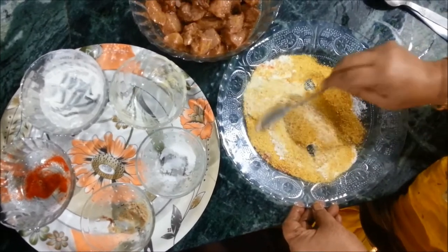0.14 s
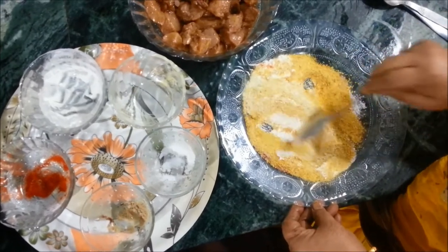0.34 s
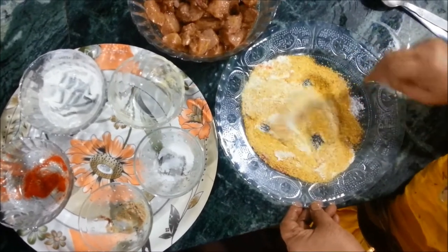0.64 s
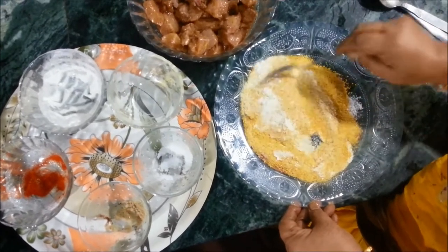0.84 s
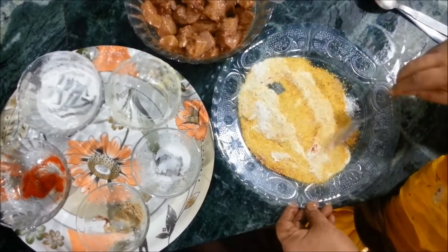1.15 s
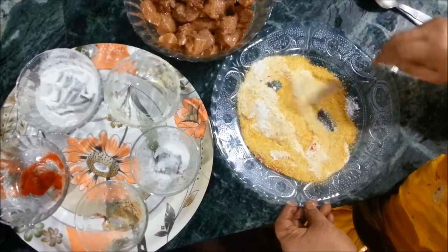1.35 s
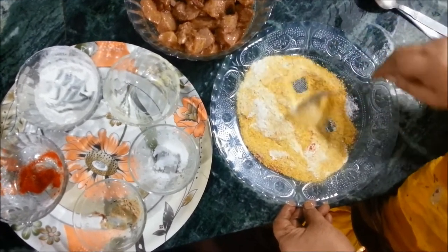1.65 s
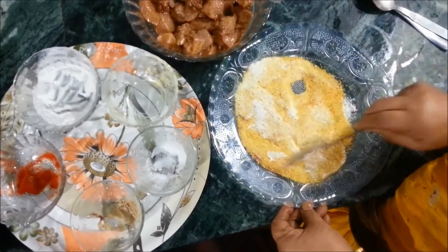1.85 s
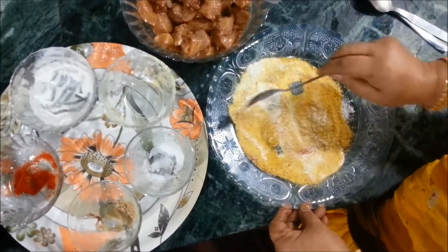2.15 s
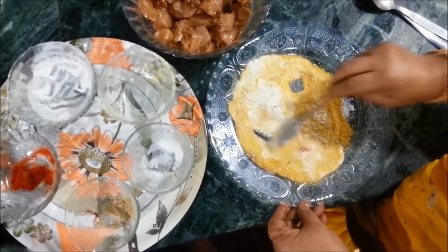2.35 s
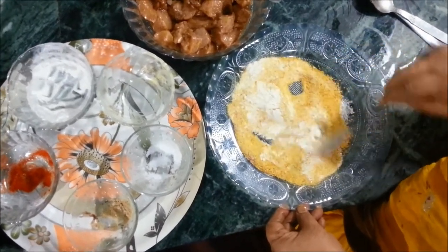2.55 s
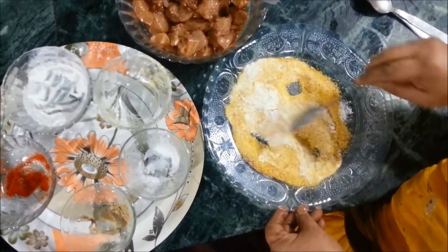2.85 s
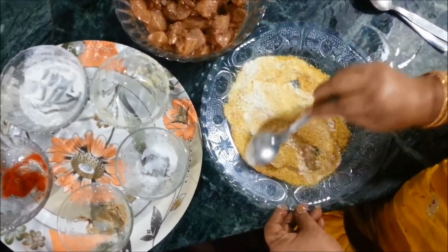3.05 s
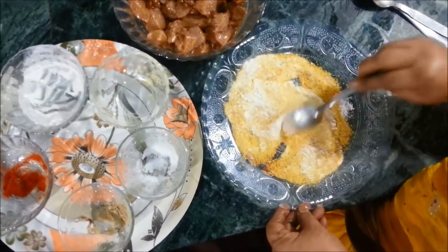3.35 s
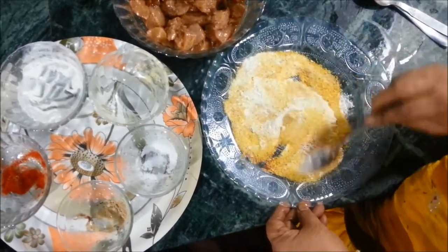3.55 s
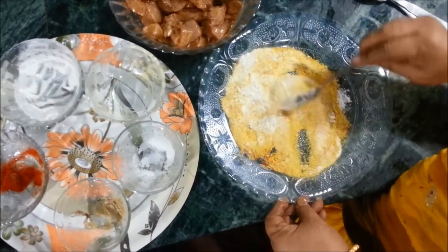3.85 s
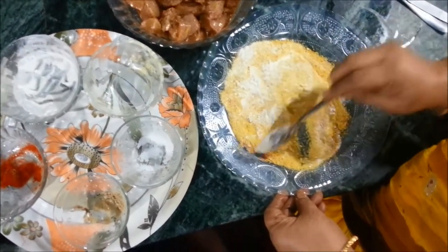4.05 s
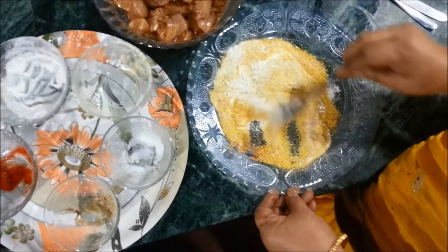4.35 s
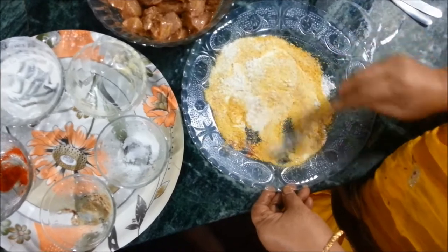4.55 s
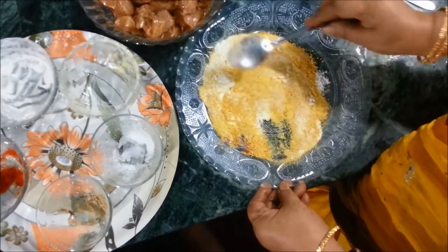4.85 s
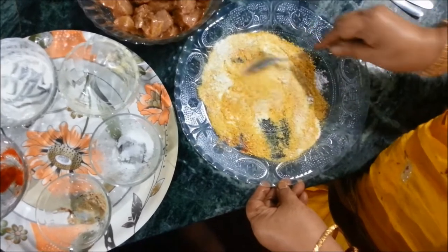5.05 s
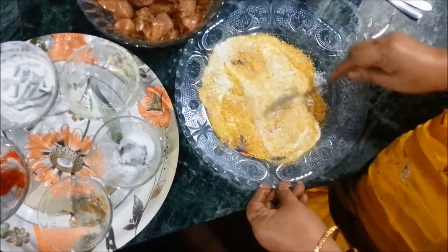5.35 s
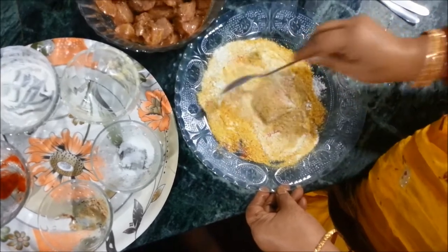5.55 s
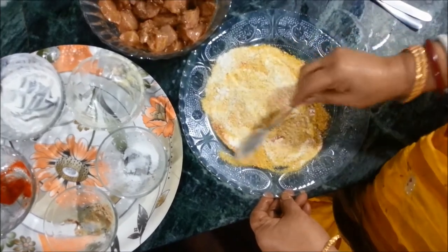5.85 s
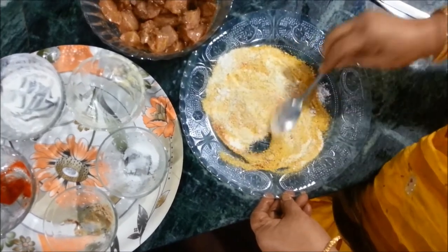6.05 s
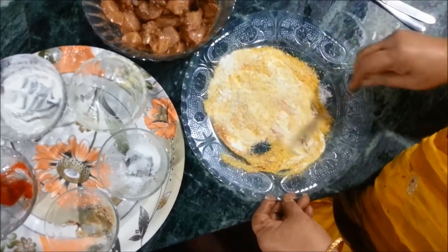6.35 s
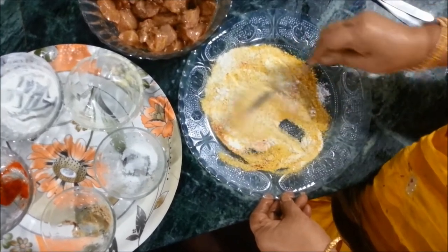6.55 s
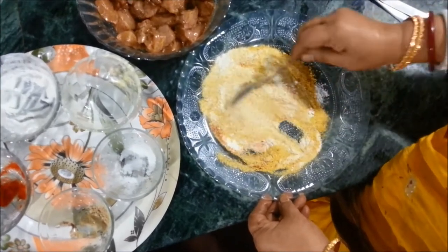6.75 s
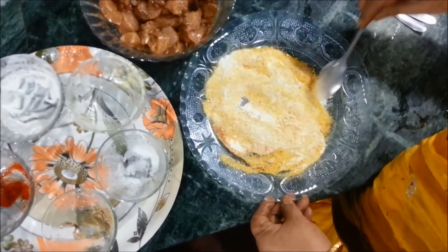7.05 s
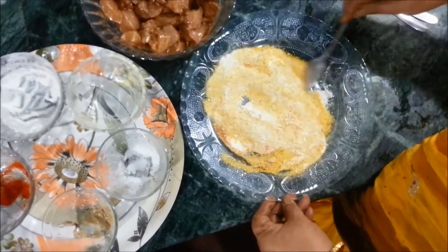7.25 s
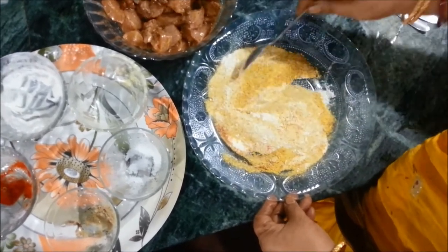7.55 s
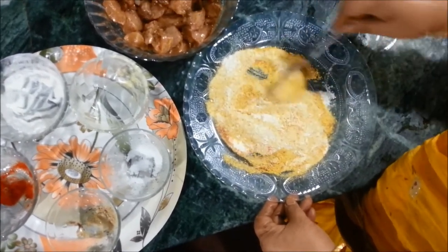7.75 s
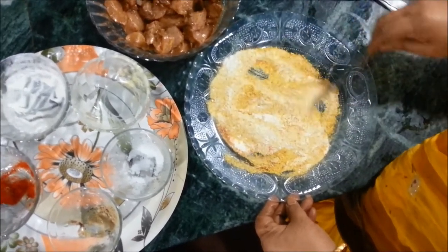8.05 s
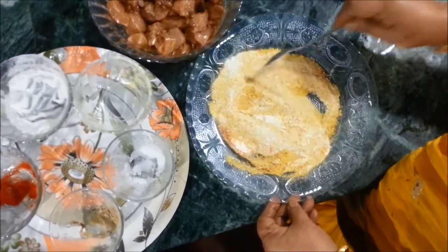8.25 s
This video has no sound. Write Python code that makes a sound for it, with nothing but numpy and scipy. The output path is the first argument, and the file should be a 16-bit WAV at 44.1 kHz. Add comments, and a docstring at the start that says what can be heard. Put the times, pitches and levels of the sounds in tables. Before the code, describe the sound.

A close stereo view of a steel spoon stirring dry flour in a glass plate on a stone counter, in a small kitchen with short reverberation. From 0 to 3 seconds the strokes are short, light and gritty, two or three a second, with powdery hiss, a crisp tick at 0.5 and small bangle clinks at 0.6 and 1.9. At 3.1 a bright, hard glass clack with a scratchy rasp is the loudest event. Fuller, duller drags follow, with a solid knock at 4.2. Bangles tinkle around 5.7 to 5.8 as longer soft drags and a faint plate judder run to 6.5. Dry taps on the right come at 6.1 to 6.2, a firm low-mid knock at 7.15, bangles at 7.7, and a last scrape and knock at 8.3. Soft hiss persists; low hum swells, strongest near 6, with barely audible far tones.

```python
"""A steel spoon stirs a dry flour mixture in a glass plate on a stone counter, in a small kitchen.
Its drag, scrape and powder hiss are gritty noise, roughened by stick and slip and coloured by the plate.
Knocks are short grit bursts through the same resonances; the stirrer's bangles clink as decaying sines.
Small dry taps sound to the side, and the held plate shifts once as a juddering band of noise.
Behind lie a soft hiss, a swelling low hum with its rumble, and a few faint far tones of narrow noise."""
import sys
import numpy as np
from scipy import signal
from scipy.fft import rfft, irfft, next_fast_len
from scipy.io import wavfile

SR = 44100
rng = np.random.default_rng(int(sys.argv[2]) if len(sys.argv) > 2 else 0)


def persist_wave(psi):
    """Save psi, clipped to +-1, as 16-bit WAV."""
    counts = np.round(np.clip(psi, -1, 1) * 32767).astype(np.int16)
    wavfile.write(sys.argv[1], SR, np.atleast_2d(counts).T)


N = 369999
TIME = np.arange(N) / SR   # seconds

# colour of the gritty contact, shared by strokes and knocks: (frequency [Hz], relative density [dB per Hz])
CONTACT_COLOUR = [(120, 11.5), (300, 2.5), (800, 1), (1400, -1.5), (2100, -0.5), (2550, -3.5), (3100, -6),
                  (5000, 0.5), (7600, -2), (8800, -2.5), (12000, -4), (15000, -15)]


def stirring(drag_trim_db=-4.5, scrape_trim_db=-5.5, hiss_trim_db=-7.0, alike=0.15):
    """The spoon pushes the heap, scrapes the glass under it, and the powder hisses round its edge."""
    drag_db, scrape_db, hiss_db = stroke_levels()
    grit = coloured(stereo_noise(alike) + lumps(), CONTACT_COLOUR)
    drag = rub(grit, drag_db + drag_trim_db, 137, 1010, slips_per_s=90, slip_db=3.5, grain_db=2.0)
    scrape = rub(grit, scrape_db + scrape_trim_db, 964, 4250, slips_per_s=86, slip_db=2.5, grain_db=1.0)
    hiss = rub(grit, hiss_db + hiss_trim_db, 5520, 16000, slips_per_s=68, slip_db=2.0, grain_db=0.5)
    return drag + scrape + hiss


# the spoon's strokes, levels before the layer trims:
# (start [s], length [s], dull drag [dB], scrape on glass [dB], powder hiss [dB])
STROKES = [(0.0, 0.015, -55.5, -58, -47), (0.207, 0.06, -58.5, -56.5, -50.5),
           (0.345, 0.045, -78, -63.5, -50.5), (0.532, 0.09, -56, -49, -43),
           (0.886, 0.072, -57.5, -51.0, -50.5), (1.215, 0.13, -57.5, -49, -45.5),
           (1.565, 0.06, -58.5, -46.5, -44.0), (1.928, 0.062, -55.5, -49, -45.5),
           (2.085, 0.028, -56, -53, -62), (2.272, 0.15, -59.5, -56, -54), (2.692, 0.095, -53.5, -46, -46.5),
           (3.136, 0.13, -44, -32.5, -41), (3.284, 0.098, -57.5, -58, -45), (3.545, 0.15, -68, -61.5, -53),
           (3.65, 0.12, -49, -45, -43.5), (3.814, 0.19, -64, -60.5, -52.5), (4.159, 0.11, -43.5, -44, -44),
           (4.559, 0.093, -39.5, -43.5, -43), (4.945, 0.074, -75, -59, -49.5),
           (5.3, 0.042, -63, -49.5, -47.5), (5.366, 0.21, -56.0, -72, -80),
           (5.695, 0.047, -53.5, -52.5, -48), (5.771, 0.21, -48, -47, -45),
           (5.93, 0.29, -50.5, -51.5, -50.5), (6.324, 0.16, -50.5, -47, -45),
           (6.617, 0.26, -63, -60.5, -52), (7.143, 0.12, -44, -42, -48), (7.279, 0.031, -55, -40, -42.5),
           (7.625, 0.015, -57, -53, -46.5), (7.708, 0.057, -63, -53, -47.5), (8.017, 0.13, -55, -49, -43.5),
           (8.328, 0.06, -43.5, -43.0, -42)]
# between strokes the spoon only shifts loose powder: (drag [dB], scrape [dB], hiss [dB]), before the trims
IDLE_LEVELS = (-71, -69.5, -62)
IDLE_TURNS_PER_S, IDLE_SWING_DB = 12, 7.5
# every stroke bites, eases a little as the heap gives way, and lets go
BITE_S, EASE_DB = 0.024, 2
RELEASE_DB_PER_S, SETTLE_DB_PER_S = 218.5, 127.5   # the powder settles more slowly


def stroke_levels():
    """Drag, scrape and hiss in dB: all three follow the bite, hold and release of each stroke."""
    idle_db = np.array(IDLE_LEVELS)[:, None] + IDLE_SWING_DB * drift(IDLE_TURNS_PER_S)
    power = from_db(idle_db) ** 2
    fall = np.array([[RELEASE_DB_PER_S], [RELEASE_DB_PER_S], [SETTLE_DB_PER_S]])
    for start, length, *levels_db in STROKES:
        near = slice(*np.searchsorted(TIME, [start - BITE_S, start + length + .5]))
        t = TIME[near] - start
        bite = np.clip(t / BITE_S + .5, 0, 1)   # half way in at the start time
        ease_db = EASE_DB * (.5 - np.clip(t / length, 0, 1))
        release_db = fall * np.maximum(t - length, 0)
        stroke_db = np.array(levels_db)[:, None] + ease_db - release_db
        power[:, near] += (bite * from_db(stroke_db)) ** 2
    return 10 * np.log10(power)


def lumps(lumps_per_s=40, lump_db=22):
    """Small lumps crack under the spoon at random moments, uneven in size, well above the fine grit."""
    cracks = rng.random(N) < lumps_per_s / SR
    return from_db(lump_db) * cracks * rng.standard_normal(N)


def rub(grit, level_db, low_hz, high_hz, slips_per_s, slip_db, grain_db):
    """Friction: the spoon sticks and slips, and crushes grains of uneven size against the glass."""
    force = from_db(slip_db * drift(slips_per_s) + grain_db * drift(1400))
    return from_db(level_db) * rms_one(plate(grit * force, low_hz, high_hz))


# chatter of the spoon's edge: (start [s], end [s], pitch [Hz], width [Hz], level [dB])
RASPS = [(3.12, 3.165, 1656, 356, -30.5), (3.141, 3.19, 5920, 298, -31.5), (3.215, 3.26, 1535, 400, -31.5),
         (4.168, 4.26, 894, 690, -37.5), (4.19, 4.36, 474, 89, -49.5), (5.75, 5.97, 1314, 850, -50)]


def rasps():
    """The spoon's edge chatters during a stroke and takes on a pitch."""
    return narrow_sounds(RASPS, fade_s=0.0037)


# spoon meets plate: (time [s], level before trims [dB], strongest pitch [Hz], fall away from it [dB per octave])
KNOCKS = [(0.525, -23, 6950, 19), (0.548, -43.5, 450, 4.5), (0.9508, -45.5, 520, 7),
          (1.2521, -43, 420, 5.5), (1.317, -38.5, 5000, 3.5), (1.617, -50.5, 1500, 5.5),
          (2.0976, -48, 1180, 5.5), (2.7206, -46, 850, 5), (2.8093, -41.5, 600, 8.5),
          (2.9209, -45, 1390, 1.5), (2.9287, -43.5, 540, 6.5), (3.124, -33.5, 7000, 1),
          (3.14, -13.5, 4600, 6), (3.2393, -36.5, 1520, 1.2), (3.6697, -36.5, 920, 4.5),
          (4.1662, -20.5, 990, 12.5), (4.202, -30.5, 1100, 6), (4.5598, -38, 7040, 1.1),
          (4.6267, -45, 600, 2), (6.338, -44, 480, 4), (7.155, -19, 1970, 14), (7.634, -49, 2100, 9),
          (8.02, -35.5, 3580, 4.5), (8.138, -49, 2000, 6), (8.3336, -27.5, 2640, 6.5)]


def knocks(thud_decay_s=0.0087, contact_decay_s=0.0015, thud_db=1.0, body_db=-1.0, ring_db=-4.0,
           tick_db=-2.0, top_db=-17.0, hardness=0.57, alike=0.39):
    """A brief gritty contact sets the plate ringing, most strongly round one pitch; the thud lasts longest."""
    size = SR // 20
    t, out = np.arange(size) / SR, np.zeros((2, N + size))
    ranges_hz = [(220, 1030), (1150, 2190), (2800, 5000), (5600, 9200), (8600, 15600)]   # thud up to top
    trims_db = [thud_db, body_db, ring_db, tick_db, top_db]
    middles_hz = np.sqrt(np.prod(ranges_hz[:-1], axis=1))
    for s, level_db, hz, fall_db in KNOCKS:
        octaves_away = np.abs(np.log2(middles_hz / hz))
        thud, body, ring, tick = level_db - fall_db * octaves_away
        top = tick + hardness * (tick - ring)   # a hard, light contact reaches highest
        levels_db = np.add([thud, body, ring, tick, top], trims_db)
        grit = coloured(stereo_noise(alike, size=size), CONTACT_COLOUR)
        at = round(s * SR)
        for k, (low_hz, high_hz) in enumerate(ranges_hz):
            decay_s = contact_decay_s if k else thud_decay_s
            part = plate(grit * np.exp(-t / decay_s), low_hz, high_hz)
            out[:, at:at + size] += burst(part, levels_db[k], 0)
    return out[:, :N]


# resonances of the plate with the spoon on it: (pitch [Hz], width [Hz], lift [dB])
PLATE_RESONANCES = [(316.7, 22, 8.5), (461, 41, 7.5), (605, 95, 4), (903, 18, 3), (1065, 200, -0.5),
                    (1490, 29, 1), (1682, 15, 4.5), (1900, 34, 1.5), (2067, 120, 2), (2890, 35, 6.5),
                    (3550, 390, 3.5), (4610, 130, 2), (4970, 75, 6.5), (5890, 43, 7), (6100, 55, 7),
                    (6390, 76, 10), (6985, 410, 9.5), (7700, 130, 8.5), (9300, 91, -2.5)]


def plate(x, low_hz, high_hz):
    """One range of the plate's sound: each resonance in it weights its own pitch and rings on."""
    for hz, width_hz, lift_db in PLATE_RESONANCES:
        if low_hz < hz < high_hz:
            r = np.exp(-np.pi * width_hz / SR)   # pole radius: a narrow resonance rings longer
            feed = np.array([1, 0, -1]) * (1 - r * r) / 2
            feedback = [1, -2 * r * np.cos(2 * np.pi * hz / SR), r * r]
            x = x + (from_db(lift_db) - 1) * signal.lfilter(feed, feedback, x)
    return band(x, low_hz, high_hz)


# bangles touch: (time [s], level before trim [dB], top partials relative [dB])
CLINKS = [(0.2554, -43.5, -14), (0.558, -35.5, -10), (1.2027, -41, -14), (1.948, -31.5, -17),
          (2.836, -42.5, -7), (3.249, -36, -22), (4.7487, -42, -33), (4.955, -45, -26), (5.0902, -49, -16),
          (5.693, -40.5, -23), (5.7794, -33, -9), (5.825, -34.5, 0), (6.6221, -36.5, -4), (6.824, -51, -14),
          (7.4158, -50.5, -13), (7.7349, -38, -8), (7.75, -40.5, 1), (8.1888, -51, -8)]
# modes of the bangles: (pitch [Hz], relative level [dB], t60 [s])
BANGLE_MODES = [(3964, -15.5, 0.083), (5860, -13.5, 0.16), (7990, -0.5, 0.08), (8120, -1, 0.12),
                (8310, -5, 0.17), (11440, -15.5, 0.15), (13600, -2, 0.17), (13560, -14, 0.13)]
REBOUND_S, REBOUND_DB = .007, -4.5   # typical gap to the bounce, and its level below the touch


def bangles(level_db=-3.5, pan_db=3.5, spread_db=1.0, follow=0.47, usual_top_db=-6.0, tick_db=-4.0,
            detune=0.0022):
    """Metal rings touch and bounce once; each contact ticks and rings every mode with its own strength."""
    rebounds = [(s + REBOUND_S * 2 ** rng.uniform(-1, 1), peak + REBOUND_DB, top) for s, peak, top in CLINKS]
    s, peak_db, top_db = np.transpose(CLINKS + rebounds)
    at, t = np.round(s * SR).astype(int), np.arange(SR // 8) / SR
    hz, mode_db, t60 = np.transpose(BANGLE_MODES)[:, :, None]
    out, fade = np.zeros((2, N + len(t))), from_db(-60 * t / t60)
    for i, peak, top in zip(at, peak_db, top_db):
        brightness_db = follow * (top - usual_top_db) * (hz > 10000)   # moves the top partials only
        strength_db = mode_db + spread_db * rng.standard_normal(hz.shape) + brightness_db
        pitch = hz * (1 + detune * rng.standard_normal(hz.shape))   # no two bangles are quite alike
        phase = 2 * np.pi * rng.random((2, len(hz), 1))
        partials = from_db(strength_db) * fade * np.sin(2 * np.pi * pitch * t + phase)
        ring = np.sum(partials, axis=1)
        contact = rng.standard_normal((2, len(t))) * np.exp(-t / 0.0042)
        tick = from_db(tick_db) * band(contact, 4500, 14000)
        out[:, i:i + len(t)] += from_db(peak + level_db) * (ring + tick)
    return out[:, :N] * from_db([[pan_db / 2], [-pan_db / 2]])


# small close taps, levels before trims: (time [s], thud [dB], click [dB], left over right [dB])
TAPS = [(0.222, -55.5, -52, -23), (0.9056, -61, -54.5, -18), (1.4271, -59.5, -57, -18),
        (2.272, -53, -50.5, -26), (2.3622, -58, -54, -18), (4.114, -61, -49.5, -18),
        (6.1143, -53, -38.5, -32), (6.1827, -40, -41, -35), (7.1546, -62, -27, -4)]


def taps(decay_s=0.0022, thud_db=4.0, click_db=-1.0, split_hz=1080, top_hz=2600):
    """Soft, dead taps: a fast-fading push of noise split into thud and click, with no ring and no room."""
    size = SR // 20
    fade, out = np.exp(-np.arange(size) / SR / decay_s), np.zeros((2, N + size))
    for s, thud, click, pan_db in TAPS:
        at, push = round(s * SR), rng.standard_normal(size) * fade
        out[:, at:at + size] += burst(band(push, 60, split_hz), thud + thud_db, pan_db)
        out[:, at:at + size] += burst(band(push, split_hz, top_hz), click + click_db, pan_db)
    return out[:, :N]


# the held plate shifts on the counter: (start [s], end [s], pitch [Hz], width [Hz], level before judder [dB])
SHIFTS = [(5.85, 6.55, 245, 222, -55.5)]


def shifting(judder_db=4.5):
    """The plate judders as it slides on the stone: a low noise band with a fast, uneven level."""
    return narrow_sounds(SHIFTS, fade_s=0.071) * from_db(judder_db * drift(55))


# the kitchen's reverberation: (frequency [Hz], t60 [s])
KITCHEN_T60 = [(150, 0.25), (500, 0.39), (1500, 0.41), (4000, 0.46), (8000, 0.31), (15000, 0.39)]


def kitchen(x, wet_db=-8.0, early_db=-6.0, early_s=0.016, gap_s=0.0014, cross=0.17):
    """A quick burst of reflections off counter and dishes, and a diffuse tail with its own decay per band."""
    size = SR * 3 // 4
    t, tail = np.arange(size) / SR, 0
    edges_hz = np.geomspace(100, 16000, 9)
    for low_hz, high_hz in zip(edges_hz, edges_hz[1:]):
        t60 = at_hz(KITCHEN_T60, np.sqrt(low_hz * high_hz))
        tail = tail + band(rng.standard_normal((2, size)), low_hz, high_hz) * from_db(-60 * t / t60)
    early = stereo_noise(0.78, size=size) * np.exp(-t / early_s)
    arrived = np.clip(t / gap_s - 1, 0, 1)   # silent for one gap, fully in after two
    response = from_db(wet_db) * rms_one(tail * arrived) + from_db(early_db) * rms_one(early * arrived)
    spilled = x + cross * x[::-1]   # each side also feeds the other
    return signal.fftconvolve(spilled, response / np.sqrt(size), axes=1)[:, :N]


# faint tones come and go: (start [s], end [s], pitch [Hz], width [Hz], level before flutter [dB])
WHINES = [(.42, 0.89, 2850, 139, -72), (1.693, 1.936, 1840, 650, -65.5), (2.302, 2.7, 2820, 110, -75),
          (6.015, 6.526, 3274, 110, -59.5), (6.199, 6.506, 3630, 110, -58.5), (6.4, 6.95, 350, 98, -62),
          (6.505, 7.16, 3266, 80, -69), (6.499, 7.16, 3610, 110, -70)]


def whine(flutter_db=1.9):
    """Thin, unsteady tones from far away: narrow noise with a fluttering level."""
    return narrow_sounds(WHINES, fade_s=0.024) * from_db(flutter_db * drift(14))


# the hum swells and dips: (start [s], end [s], top of the arch above the resting hum's gain [dB])
HUM_SWELLS = [(2.2, 3.03, -67), (3.0, 3.56, -59.5), (3.524, 3.878, -54.5), (3.913, 4.465, -54.5),
              (4.496, 4.724, -58), (4.79, 5.334, -63), (5.243, 5.74, -55.5), (5.69, 6.243, -47),
              (6.18, 6.693, -46.5), (6.618, 7.282, -51.5), (7.27, 7.71, -55), (7.69, 7.95, -64.5),
              (7.95, 8.597, -54.5)]


def hum_level(rest_db=-73.5):
    """Each swell adds one smooth arch to the resting level; the result is in dB."""
    gain = from_db(rest_db)
    for start, end, top_db in HUM_SWELLS:
        gain = gain + from_db(top_db) * np.sin(np.pi * np.clip((TIME - start) / (end - start), 0, 1))
    return 20 * np.log10(gain)


# colour of the rumble: (frequency [Hz], relative density [dB per Hz])
RUMBLE_COLOUR = [(25, -4.5), (50, -0.5), (75, -22.5), (93, 14.5), (115, 1), (150, -5.5), (220, -1),
                 (400, -9.5), (800, -25.5)]
# colour of the hiss before the stereo balance: (frequency [Hz], relative density [dB per Hz])
HISS_COLOUR = [(59, -66), (100, 5.5), (152, -6), (330, -12), (962, -15), (1530, -16), (1920, -14),
               (3110, -16), (5150, -18.5), (6220, -6.5), (7050, -8), (8700, -19), (10700, -14.5),
               (13800, -15), (15000, -45)]


def background(hum_hz=59.2, waver=0.55, rumble_db=-58.5, usual_hum_db=-53.5, follow=0.61, hiss_db=-60.5):
    """A low sine hum wavering in phase, a lumpy noise rumble that swells with it, and steady hiss."""
    hum_db = hum_level()
    phase = 2 * np.pi * hum_hz * TIME + waver * drift(15)   # waver in radians
    hum = from_db(hum_db + drift(4.7)) * np.sqrt(2) * np.sin(phase)
    swell_db = follow * (hum_db - usual_hum_db)
    rumble_gain = from_db(rumble_db + swell_db + 2 * drift(25))
    rumble = rumble_gain * rms_one(coloured(stereo_noise(0.88), RUMBLE_COLOUR))
    hiss = from_db(hiss_db) * rms_one(balanced(coloured(stereo_noise(0.058), HISS_COLOUR)))
    return hum + rumble + hiss


# the two sides hear the counter differently: (frequency [Hz], left over right [dB])
BALANCE = [(60, -1), (200, -4.5), (500, -4.5), (1400, -2), (2400, -4.5), (4300, -2), (6500, 10.5),
           (8200, 7.5), (13000, 2.5)]


def balanced(pair):
    """Lows and mids lean to the right, treble to the left."""
    sides = [[(hz, side * db / 2) for hz, db in BALANCE] for side in (1, -1)]
    return np.array([coloured(x, spectrum) for x, spectrum in zip(pair, sides)])


def from_db(db):
    """Decibels to gain."""
    return 10 ** (np.asarray(db) / 20)


def rms_one(x):
    """Scale to unit power."""
    return x / np.sqrt(np.mean(x ** 2) + 1e-20)


def at_hz(points, hz):
    """Read a table on a log-frequency axis."""
    table_hz, values = np.array(points).T
    return np.interp(np.log(hz + 1), np.log(table_hz), values)


def coloured(x, spectrum):
    """Give a sound a smooth spectrum."""
    size = next_fast_len(x.shape[-1])
    gain = from_db(at_hz(spectrum, np.fft.rfftfreq(size, 1 / SR)))
    return irfft(rfft(x, size) * gain, size)[..., :x.shape[-1]]


def stereo_noise(alike, size=N):
    """White noise, partly shared by the two sides."""
    mid, side = rng.standard_normal((2, size))
    alike = np.clip(alike, 0, 1)
    return np.sqrt(1 + alike) * mid + np.sqrt(1 - alike) * side * [[1], [-1]]


def drift(rate):
    """Smooth chance of unit power, joining `rate` random points a second."""
    points = rng.standard_normal(N // 20)
    return rms_one(np.interp(TIME * rate, np.arange(len(points)), points))


def band(x, low_hz, high_hz):
    """Causal band-pass."""
    edges_hz = [low_hz, min(high_hz, .45 * SR)]
    return signal.sosfilt(signal.butter(3, edges_hz, "band", fs=SR, output="sos"), x)


def burst(x, level_db, pan_db):
    """Set the level of a short sound, its energy counted over a hundredth of a second, and its side."""
    sides = rms_one(from_db(pan_db * np.array([[.5], [-.5]])))
    loudness = np.sqrt(np.sum(x ** 2, axis=-1, keepdims=True) * 100 / SR)
    return from_db(level_db) * sides * x / loudness


def narrow_sounds(rows, fade_s):
    """Stretches of narrow-band noise with soft ends."""
    out = np.zeros((2, N))
    for start, end, hz, width_hz, level_db in rows:
        at = np.arange(round(start * SR), round(max(end, start + .01) * SR))
        t = (at - at[0]) / SR
        noise = stereo_noise(0.2, size=len(at) + SR // 10)   # extra lead-in lets the filter settle
        tone = band(noise, max(hz - width_hz / 2, 20), hz + width_hz / 2)[:, -len(at):]
        fade = np.clip(np.minimum(t, t[::-1]) / fade_s, 0, 1)
        out[:, at] += from_db(level_db) * rms_one(tone) * fade
    return out


def scene(stir_room_db=-4.5, bangle_room_db=-5.5, right_lag_s=.00007):
    """Spoon, plate and bangles sound into the kitchen; their direct sound reaches the left side first."""
    strokes, hits, clinks = stirring() + rasps(), knocks(), bangles()
    room = kitchen(hits + from_db(stir_room_db) * strokes + from_db(bangle_room_db) * clinks)
    left, right = hits + strokes + clinks
    direct = np.array([left, np.roll(right, round(right_lag_s * SR))])
    return balanced(direct + room) + taps() + shifting() + whine() + background()


def record(dry, ceiling=.85, cutoff_hz=14750):
    """The loudest peaks are rounded and the top is cut steeply."""
    rounded = ceiling * np.tanh(dry / ceiling)
    return signal.sosfilt(signal.ellip(10, .3, 80, cutoff_hz, fs=SR, output="sos"), rounded)


dry = scene()
out = record(dry)
persist_wave(out)
```